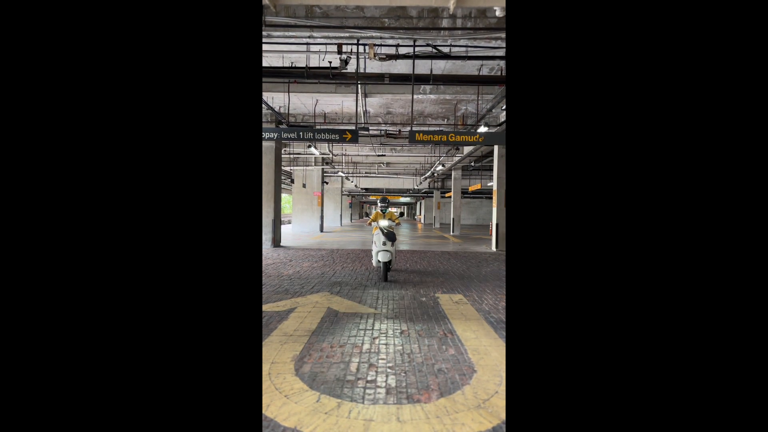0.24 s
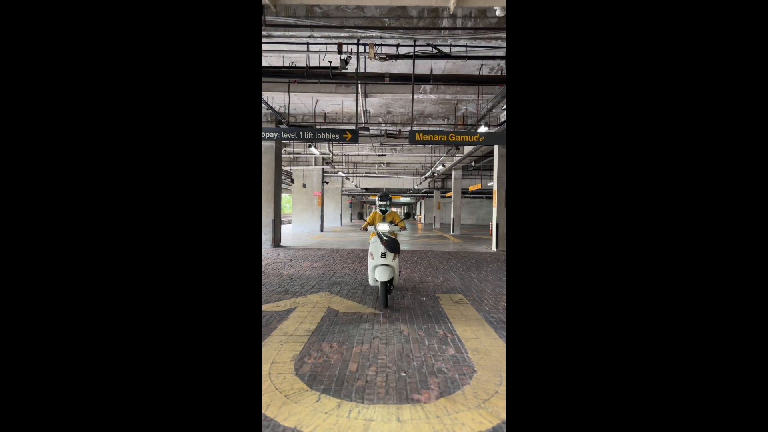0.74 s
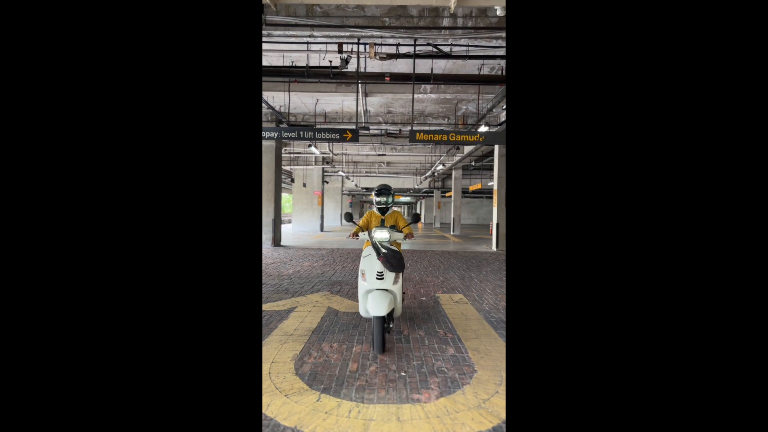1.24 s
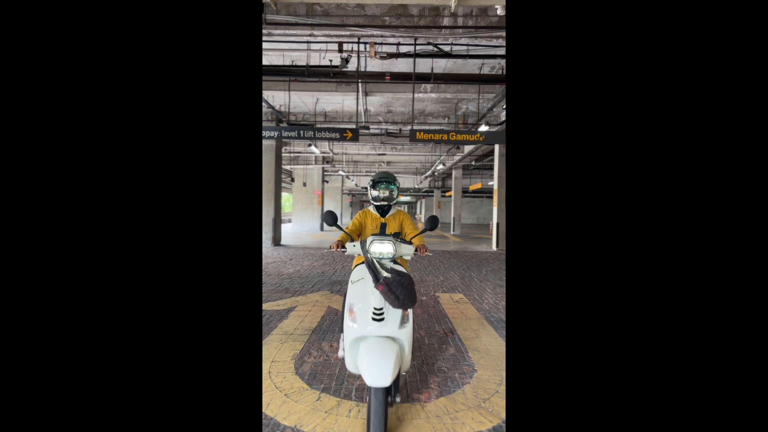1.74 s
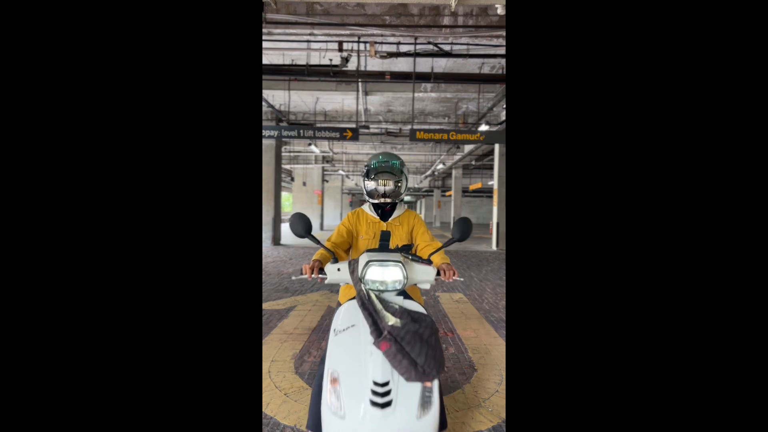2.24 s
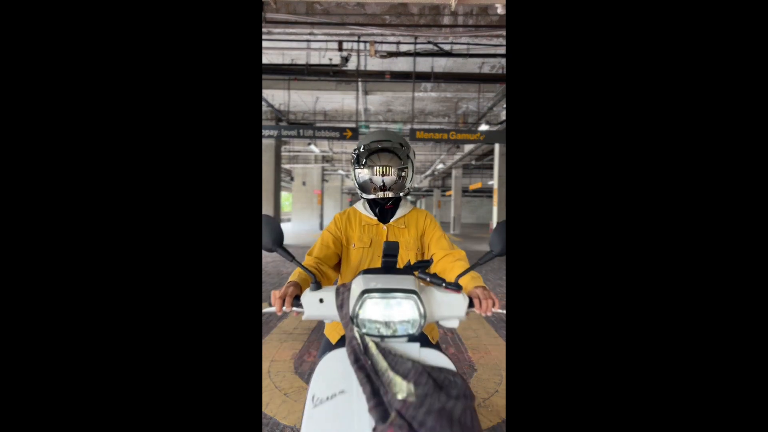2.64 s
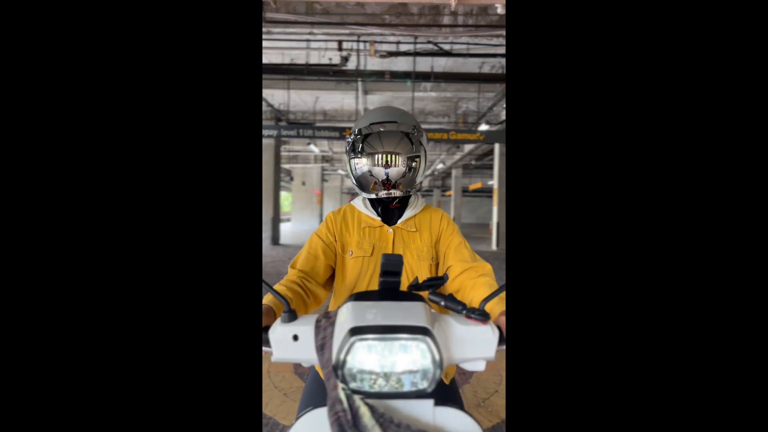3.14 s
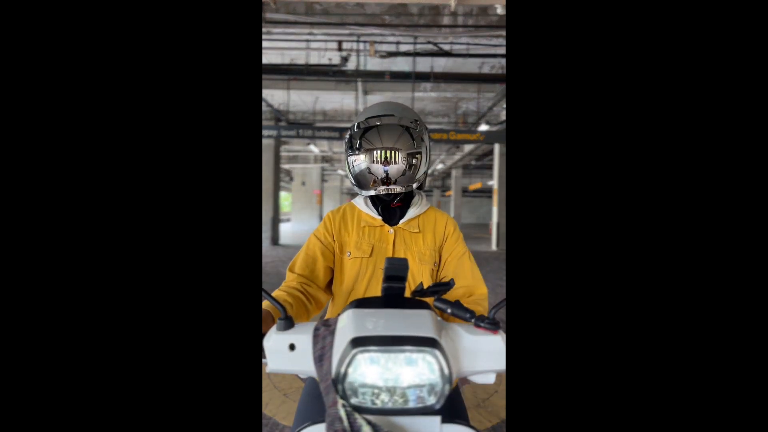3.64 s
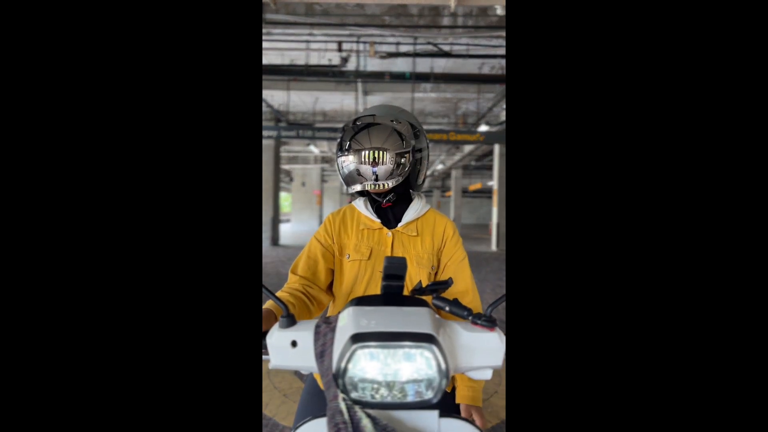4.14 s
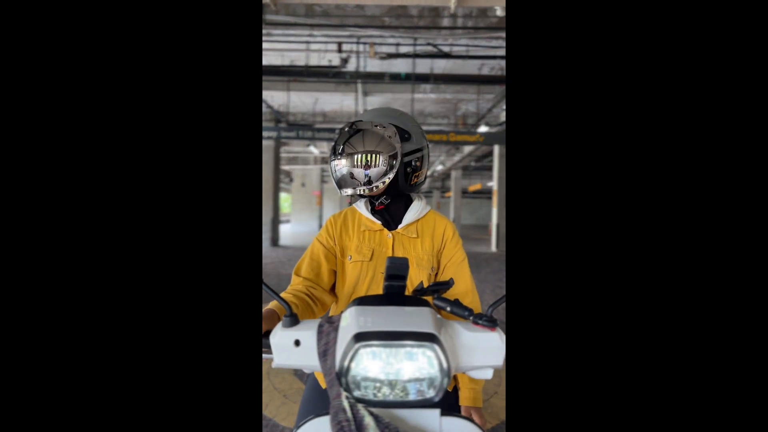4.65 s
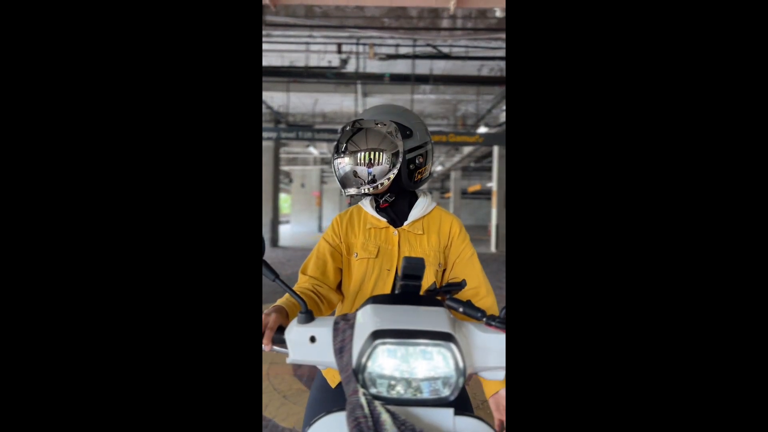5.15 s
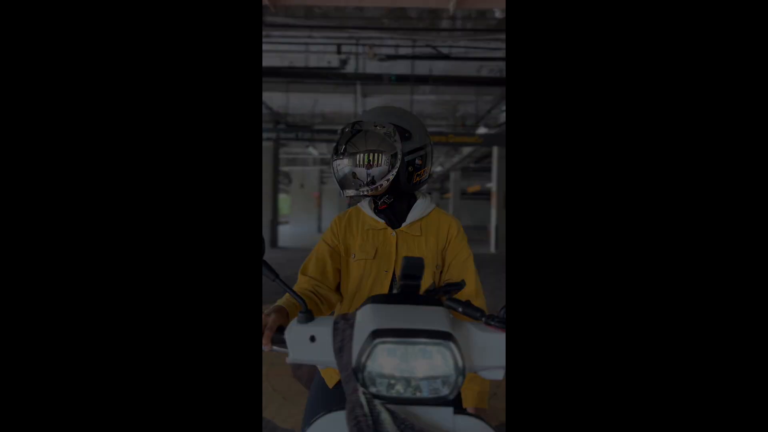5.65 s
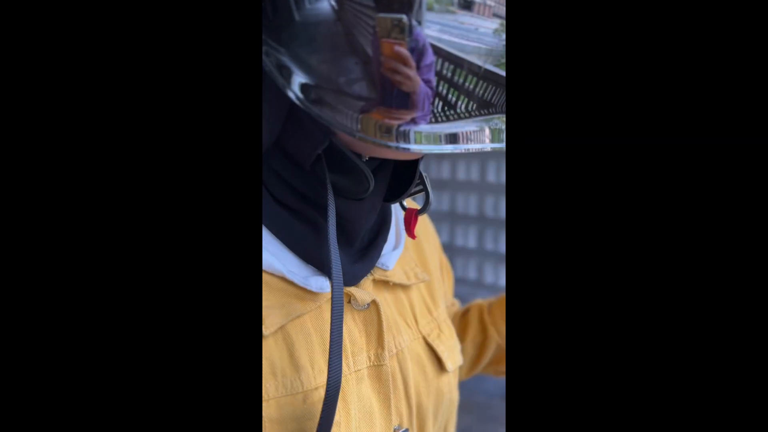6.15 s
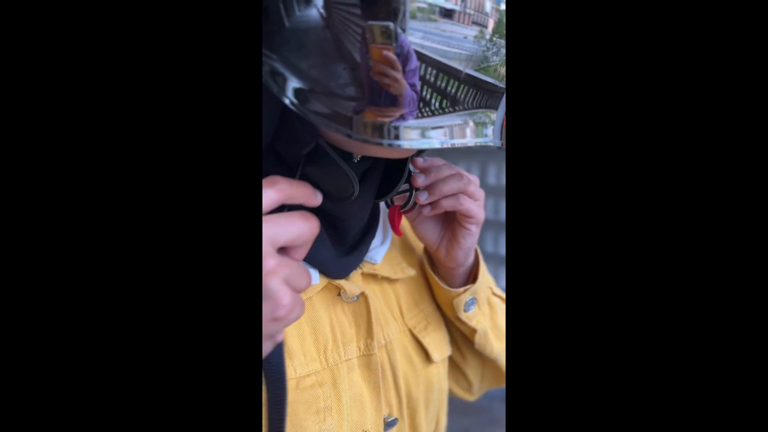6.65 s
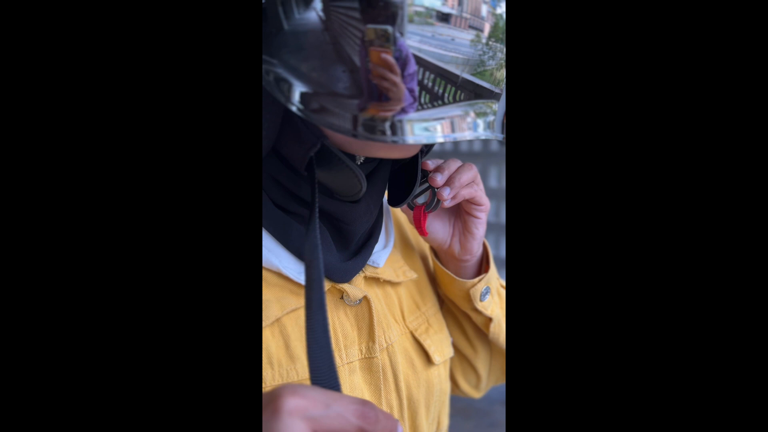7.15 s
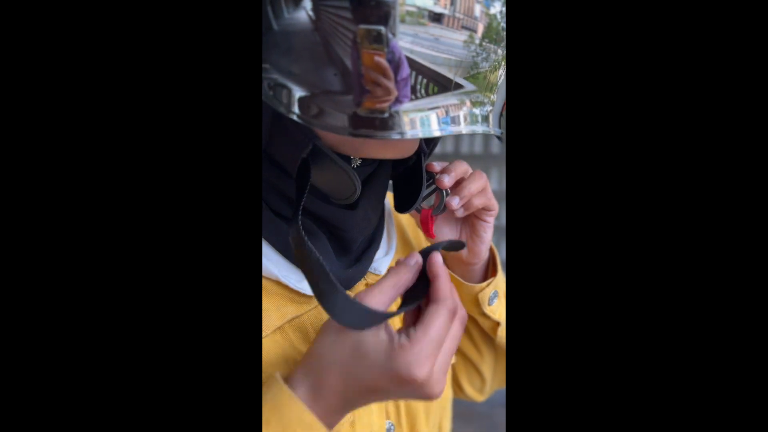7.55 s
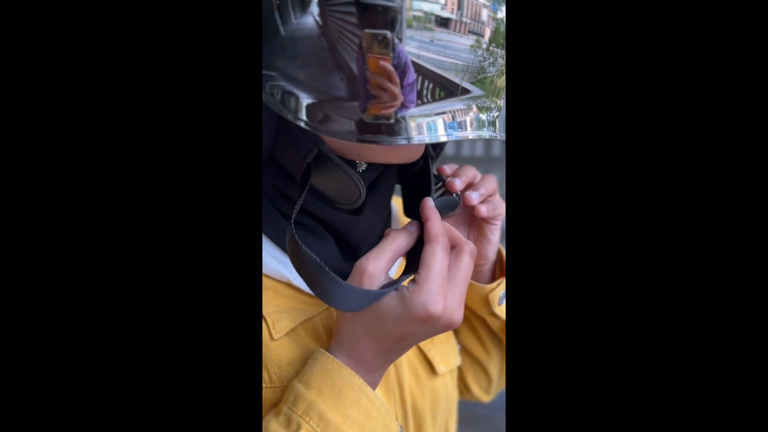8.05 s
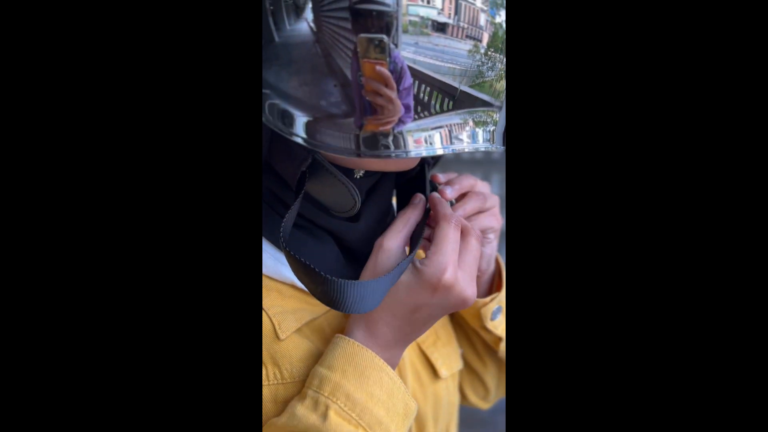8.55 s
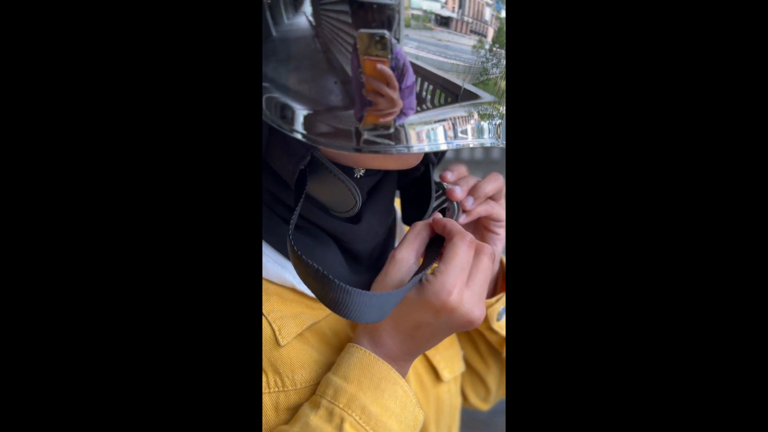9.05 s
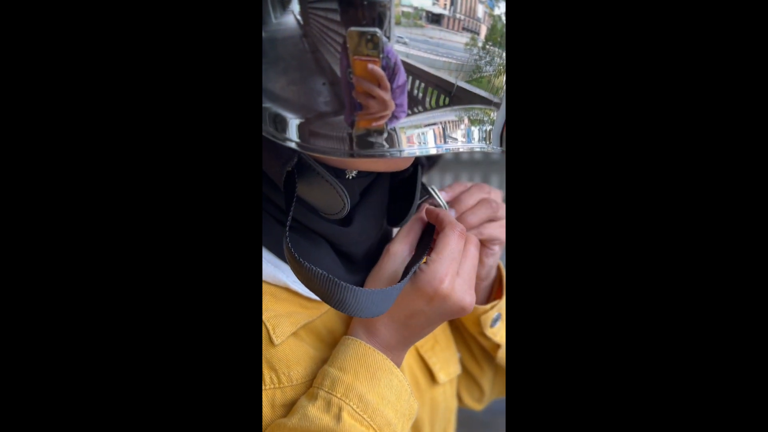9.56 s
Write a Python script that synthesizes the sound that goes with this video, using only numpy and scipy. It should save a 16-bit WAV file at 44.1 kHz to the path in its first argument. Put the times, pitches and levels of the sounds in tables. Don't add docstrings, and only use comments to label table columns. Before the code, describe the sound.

From 0 s, a single-cylinder scooter putters at a low, steady fifteen or so puffs per second through a concrete car park, booming from a distance over soft traffic rumble and airy roar. Between about 1.2 and 3 s it draws close; thin, high, stuttering brake squeaks chirp and echo, strongest around 2.5 to 2.9 s. From 3 to 5.8 s it idles nearby, thumping slightly unevenly, with tiny bright valve ticks clearest around 4 to 5 s. A split-second silence at 5.8 s cuts abruptly to a quieter street with low traffic wash and brief distant engine swells. Faint buckle ticks come around 6.5 to 6.7 s and 7.6 s, with very soft webbing slides. A firmer click lands at 9.0 s and a sharp double snap at 9.4 s. A car's low, throbbing hum and faint tyre sizzle grow from about 8.3 s, remaining near until the end at 9.8 s.

```python
import sys
import numpy as np
from scipy import signal
from scipy.fft import rfft, irfft, next_fast_len
from scipy.io import wavfile
from scipy.ndimage import uniform_filter1d, map_coordinates

SR = 44100
rng = np.random.default_rng(int(sys.argv[2]) if len(sys.argv) > 2 else 0)


def volts_from_db(level):
    exponent = np.asarray(level, float) / 20
    return 10 ** exponent


def waveform_to_disk(signal):
    frames = np.transpose(np.atleast_2d(signal))
    scaled = np.clip(frames, -1, 1) * 32767
    samples = np.round(scaled).astype(np.int16)
    wavfile.write(sys.argv[1], SR, samples)


N = 432621

# t/s, firing rate/Hz
ENGINE_SPEED = [(0, 14.55), (1.5, 14.0), (1.9, 14.74), (2.2, 15.27), (2.5, 15.378), (2.8, 15.48),
                (3.1, 14.972), (3.4, 15.065), (3.7, 15.31), (4.0, 15.177), (4.3, 15.15), (4.6, 14.977),
                (4.9, 14.665), (5.2, 15.225), (5.5, 15.624), (5.8, 15.488)]
# t/s, distance/m
APPROACH = [
    (0, 11),
    (1.5, 9.7),
    (2.1, 2.8),
    (2.7, 1.6),
    (3.3, 2.12),
    (4.1, 1.7),
    (5.1, 1.95),
    (5.8, 1.2),
]
# f/Hz, width/Hz, level/dB
PIPE_MODES = [(153, 11, 1), (178.2, 7, -2.5), (223, 37, -15)]
# f/Hz, width/Hz, level/dB
BODYWORK_MODES = [(61.6, 6, -7), (73.3, 6, -9.5), (95.2, 6, -11.5), (132.8, 8, -12)]
# f/Hz, width/Hz, level/dB
DECK_MODES = [(54.6, 8.3, -4.5), (140, 24, -9.5), (178.6, 16, 1.5), (179, 19, -5)]
# t/s, length/s, f/Hz, level/dB
PARK_DRONES = [(0.023, 0.6, 114.8, -29.5), (0.45, 0.39, 112, -29), (1.2, 0.29, 155, -32.5),
               (0.8, 0.62, 83.4, -27), (1.4, 0.36, 112, -27.5), (1.498, 0.61, 79.6, -27),
               (1.75, 0.48, 160, -28.5), (1.9, 0.85, 114.6, -34), (2.5, 0.46, 79.9, -27),
               (2.9, 0.31, 229.3, -32.5), (3.22, 0.3, 77.9, -25), (3.35, 0.35, 153, -34),
               (3.6, 0.45, 109.7, -31.5), (4.2, 0.29, 76.8, -35), (4.56, .3, 150, -30),
               (4.5, 0.45, 76.1, -30)]
# t/s, level over its mean/dB
PARK_FLOW = [
    (0, .5),
    (1.4, 0),
    (2.1, 0.6),
    (3.5, 0.33),
    (5.3, -0.35),
    (5.8, -0.5),
]
# f/Hz, density/dB per Hz
PARK_RUMBLE = [
    [(15, -59), (25, -30), (53, -3.5), (70, 0), (123, -4), (141, -6), (240, -8.5), (450, -16.5), (580, -44), (990, -120)],
    [(15, -64), (25, -34), (81, 2), (152, -12), (188, -7), (220, -4), (450, -8.5), (580, -38), (990, -120)],
]
PARK_ROAR = [
    [(180, -58), (300, -7), (349, -29), (436, -3), (670, -5.5), (960, 0), (1560, -11), (1920, -17.5), (3830, -26.5), (4780, -29), (6390, -33.5), (7550, -40.5), (8200, -80), (10700, -101), (18000, -120)],
    [(180, -32), (300, -23), (385, -34), (424, -6), (748, -4), (1210, -3.5), (1580, -9.5), (1840, -21.5), (2530, -22.5), (4980, -29.5), (8200, -36), (10700, -53), (18000, -120)],
]
PARK_HISS = [
    [(8200, -32), (8800, -10.5), (9500, 0.5), (11000, 4), (12800, 4), (14300, -0.5), (14900, -15), (15700, -33)],
    [(7500, -29), (8300, -2), (9200, -3), (10100, -0.5), (10900, -11), (11600, -36), (12600, -30), (13200, -11), (14200, 0), (15200, -13), (15800, -19)],
]
# t/s, length/s, level/dB, start f/Hz, glide/Hz
SQUEAKS = [(1.19, .045, -47, 6800, -30), (1.238, .02, -35, 6760, -20), (1.268, .024, -34, 6750, -20),
           (1.298, .02, -35, 6740, 0), (1.319, .018, -34, 6730, 0), (1.34, .03, -40, 6740, 0),
           (1.365, .03, -38, 6760, 120), (1.4, .06, -43, 6780, 0), (1.525, .022, -32, 6780, 220),
           (1.552, .062, -35, 6850, -30), (1.625, .022, -37, 6800, -250), (1.69, .06, -45, 7330, 0),
           (1.75, .025, -38, 7600, 20), (1.803, .022, -26, 7150, -330), (1.821, .008, -35, 6750, -450),
           (1.828, .016, -25, 6980, 240), (1.841, .027, -25, 7170, 50), (1.845, .05, -36, 6900, 0),
           (1.88, .022, -36, 7600, 30), (1.905, .03, -33, 7600, 40), (1.96, .02, -36, 7640, 40),
           (2.008, .014, -36, 7600, 0), (2.185, .025, -36, 7250, -300), (2.21, .05, -29, 7000, -170),
           (2.265, .04, -35, 6930, 60), (2.455, .02, -39, 7330, 20), (2.47, .022, -33, 7350, 30),
           (2.514, .022, -28, 7620, -60), (2.537, .04, -23, 7530, 70), (2.598, .055, -29, 7570, -30),
           (2.62, .04, -33, 7280, -100), (2.67, .035, -29, 7200, 20), (2.72, .035, -33, 7220, -20),
           (2.785, .02, -38, 7700, 400), (2.79, .022, -21, 7600, -40), (2.812, .036, -20, 7550, -10),
           (2.852, .026, -23, 7600, 60), (2.888, .044, -26, 7570, -40), (2.946, .016, -28, 7570, 0),
           (2.97, .016, -26, 7590, 0)]
# f/Hz, t60/s
PARK_REVERB = [(200, 1.2), (3000, 1), (7000, 0.89), (15000, 0.093)]
# t/s, peak level/dB
VALVE_TICKS = [(3.0467, -51), (3.1385, -48), (3.1719, -50), (3.2079, -48), (3.3396, -54), (3.4718, -46),
               (3.5067, -49), (3.5406, -48), (3.6055, -48), (3.6733, -51), (3.7372, -46), (3.801, -46),
               (3.8334, -46), (3.8664, -44), (3.8988, -52), (3.9322, -43), (3.9656, -49), (3.9991, -42),
               (4.0644, -42), (4.0973, -53), (4.1303, -44), (4.1951, -43), (4.229, -49), (4.2625, -42),
               (4.2954, -47), (4.3293, -40), (4.3947, -47), (4.4281, -48), (4.461, -44), (4.5274, -46),
               (4.5942, -46), (4.6601, -43), (4.6935, -50), (4.7279, -45), (4.7623, -54), (4.7957, -47),
               (4.8302, -50), (4.8636, -39), (4.9339, -41), (5.0028, -50), (5.4637, -50), (5.5291, -52),
               (5.5914, -48), (5.6568, -50), (5.7201, -48)]
# f/Hz, width/Hz, level/dB
VALVE_MODE = [(13600, 3600, 0)]
# t/s, level over its mean/dB
STREET_FLOW = [
    (5.79, 3),
    (5.86, -1),
    (6.8, -0.7),
    (7.8, -0.1),
    (8.8, 0.7),
    (9.81, 1.4),
]
# f/Hz, density/dB per Hz
STREET_RUMBLE = [
    [(15, -53), (25, -23), (47, -7.5), (65, 1.5), (97, -6), (138, -7.5), (170, -6.5), (210, -7), (243, -7.5), (329, -13.5), (450, -19.5), (580, -21.5), (990, -120)],
    [(15, -46), (25, -15), (75, 6.5), (134, -9), (243, 5.5), (284, -4), (450, 4.5), (580, -36), (990, -120)],
]
STREET_ROAR = [
    [(180, -42), (300, -24), (331, -14), (369, -5), (461, -8.5), (895, -1.5), (1430, -5.5), (1890, -15), (2230, -15.5), (2530, -20), (5190, -35), (7340, -45), (8200, -67), (10700, -94), (18000, -120)],
    [(180, -34), (300, -17), (390, -21), (424, -16), (544, 0), (1150, 1.5), (1600, -3.5), (1740, -15), (2330, -17), (6570, -35.5), (8200, -36.5), (10700, -66), (18000, -120)],
]
STREET_HISS = [
    [(8300, -39), (8800, -8), (9300, 0.5), (11000, -4.5), (13000, -6.5), (14200, -12), (15700, -39)],
    [(7500, -32), (8200, -7), (9500, -2), (10400, 1), (11200, -31), (12800, -30), (13600, -9), (15000, -11), (15800, -26)],
]
# t/s, length/s, f/Hz, level/dB
STREET_DRONES = [
    (6.3, 0.42, 68, -34.5),
    (6.6, .2, 120, -30.5),
    (6.98, .2, 70.3, -31),
    (7.4, .25, 109.8, -34),
    (8.15, 0.2, 76.5, -40),
    (8.65, 0.17, 62, -30),
    (7.75, .2, 80, -34),
    (8.1, 0.13, 164.6, -35),
]
# t/s, peak level/dB, ring f/Hz, ring over crack/dB
BUCKLE_CLICKS = [
    (6.5061, -55, 12050, -5),
    (6.6388, -68, 13100, 0),
    (6.6867, -53, 11800, -4),
    (6.6872, -57, 13200, -2),
    (6.7161, -64, 11900, 2),
    (7.5582, -56, 9700, -16),
    (9.0154, -46, 12800, -25),
    (9.4082, -35, 11800, -24),
    (9.4098, -37, 13500, -22),
]
# t/s, length/s, level/dB
SLIDES = [
    (6.6, 0.96, -78),
    (8.1, .3, -82),
    (8.65, .3, -80),
    (9.45, 0.78, -73),
]
# f/Hz, density/dB per Hz
FABRIC = [(8300, -40), (9000, -6), (11000, -2), (13000, -2), (14200, -12), (15700, -40)]
# t/s, engine order f/Hz, nearness/dB
CAR_APPROACH = [
    (7.9, 138, -30),
    (8.3, 140, -18),
    (8.75, 149, -15),
    (9.1, 156, 1.5),
    (9.81, 160, -3.5),
]
# f/Hz, density/dB per Hz
SIZZLE = [(1200, -30), (2500, 0.5), (4500, -4), (7500, -21.5), (8200, -62)]
# f/Hz, left minus right level/dB
PORTS = [(60, 0), (110, -3), (200, -2), (380, -2), (700, 0.5), (1290, -1.5), (2380, 2.0), (4400, 2.5),
         (8120, 1), (15000, -1)]

FIRING_PHASE = .067
EXHAUST_DB, BOOM_DB, BOOM_DB_PER_M = -23, -47.5, 1.43
DRONE_SAG_HZ_PER_S = 6.3
PARK_WASH_DB, STREET_WASH_DB = (-28.5, -31.5, -62), (-30.5, -34.5, -76.5)
WASH_GROWS, WASH_SIDE_DB = (0.54, 1.1, 1.1), (-11, -2.5, -1.5)
DISC_HZ, PAN_DB_PER_KHZ = 7200, -8
OCTAVE_DB, OCTAVE_DB_PER_KHZ = -30, -34
OCTAVE_GROWS = .7
PORT_LAG_S = .000052
SQUEAK_ROOM_DB, ROOM_DB_PER_KHZ = -11, -7
TICK_DB, TICK_CONTRAST = -21.5, 1.1
GAP_START_S, GAP_END_S = 5.7802, 5.7895
CRACK_T60_S, BUCKLE_T60_S = .005, .05
HUM_DB, SIZZLE_DB, SIZZLE_GROWS = -31.5, -54, 0.59
BEAT_HZ, BEAT_S = 2.88, 9.1
END_FADE_S = .004


def unit(x):
    return x / np.sqrt(np.mean(x ** 2) + 1e-20)


def along(points, hz):
    f, v = np.transpose(points)
    return np.interp(np.log(hz + 1), np.log(f + 1), v)


def curves(rows):
    s, *cols = np.transpose(rows)
    return [np.interp(np.arange(N) / SR, s, c) for c in cols]


def wobble(rate):
    coarse = np.arange(0, N + 32, 32)
    knots = rng.standard_normal(int(N * rate / SR) + 4)
    return np.interp(np.arange(N), coarse, map_coordinates(knots, [coarse * rate / SR]))


def filtered(x, response):
    m = next_fast_len(N + SR // 2)
    return irfft(rfft(x, m) * response(np.fft.rfftfreq(m, 1 / SR)), m)[..., :N]


def modes(table):
    return lambda f: sum(volts_from_db(db) * 1j * f * w / (c * c - f * f + 1j * f * w) for c, w, db in table)


def beats(turns, scatter_db, odd_db=0):
    whole = np.floor(turns).astype(int)
    at = np.flatnonzero(np.diff(whole)) + 1
    out = np.zeros(N)
    out[at] = volts_from_db(scatter_db * rng.standard_normal(len(at)) + odd_db * (whole[at] % 2))
    return out


def rush(colours, side_db, patchy_db):
    z = signal.stft(rng.standard_normal((2, N)), nperseg=512)[2]
    field = uniform_filter1d(rng.standard_normal(z.shape[1:]), 6, 0)
    field = uniform_filter1d(field, 14, 1)
    pair = signal.istft(z * volts_from_db(patchy_db * unit(field)), nperseg=512)[1][:, :N]
    mid, side = [unit(filtered(p, lambda hz: volts_from_db(along(c, hz)))) for p, c in zip(pair, colours)]
    return mid + volts_from_db(side_db) * np.outer([1, -1], side)


def engine(cycles):
    metres, = curves(APPROACH)
    exhaust_db = EXHAUST_DB - 20 * np.log10(metres)
    boom_db = BOOM_DB + BOOM_DB_PER_M * metres
    puff = np.blackman(round(.008 * SR))[40:]

    def soft(spikes):
        return signal.fftconvolve(spikes, puff)[:N]

    def band_limit(f):
        return (1j * f / (40 + 1j * f)) ** 3 / (1 + 1j * f / 900) ** 4

    near = soft(beats(cycles - FIRING_PHASE, scatter_db=1.1))
    pipe = unit(filtered(near, lambda f: modes(PIPE_MODES)(f) - modes(BODYWORK_MODES)(f)))
    far = soft(beats(2 * cycles, scatter_db=4, odd_db=-3))
    boom = unit(sum(volts_from_db(4 * wobble(3)) * filtered(far, modes([mode])) for mode in DECK_MODES))
    return volts_from_db(3) * filtered(volts_from_db(exhaust_db) * pipe + volts_from_db(boom_db) * boom, band_limit)


def drones(table):
    t, waver, out = np.arange(N) / SR, np.cumsum(2.6 * wobble(8)) / SR, 0
    for s, length, hz, db in table:
        u = np.clip(t - s, 0, length)
        sag = DRONE_SAG_HZ_PER_S * (u - length / 2) ** 2 / 2
        swell = abs(np.sin(np.pi * u / length)) ** 0.36
        out = out + volts_from_db(db) * swell * np.sin(2 * np.pi * (hz * t - sag + waver))
    return out * volts_from_db(0.74 * wobble(9.2))


def traffic(flow, mean_db, colours):
    swell, flow_db = .25 * wobble(2), curves(flow)[0]
    wash = np.zeros((2, N))
    for db, grows, colour, side_db in zip(mean_db, WASH_GROWS, colours, WASH_SIDE_DB):
        level_db = db + grows * flow_db + swell + 0.21 * wobble(9)
        wash += volts_from_db(level_db) * rush(colour, side_db, patchy_db=1.05)
    return wash


def reverb(x):
    hz, t, z = signal.stft(rng.standard_normal((2, SR)), SR, nperseg=256)
    decay = volts_from_db(-60 * t / along(PARK_REVERB, hz)[:, None])
    tail = signal.istft(z * decay, SR, nperseg=256)[1]
    return signal.fftconvolve(x[None], tail / np.linalg.norm(tail[0]), axes=1)[:, :N]


def brake():
    dry, drift = np.zeros((2, N)), 20 * wobble(120)
    fuzz = 1.5 * wobble(500)
    for s, length, db, start_hz, glide_hz in SQUEAKS:
        i, u = round(s * SR), np.linspace(0, 1, round(length * SR))
        span = slice(i, i + len(u))
        khz = (start_hz - DISC_HZ) / 1000
        turn = 2 * np.pi * np.cumsum(start_hz + glide_hz * u + drift[span]) / SR
        octave_db = OCTAVE_DB + OCTAVE_DB_PER_KHZ * khz + OCTAVE_GROWS * (db + 24)
        tone = np.sin(turn) + volts_from_db(octave_db) * np.sin(2 * turn + fuzz[span])
        tone = tone * abs(np.sin(np.pi * u)) ** 0.45 * volts_from_db(db)
        dry[:, span] += tone * volts_from_db(PAN_DB_PER_KHZ * khz * np.array([[.5], [-.5]]))
    flutter = volts_from_db(wobble(70) + 1.8 * np.array([wobble(160), wobble(160)]))
    direct = filtered(dry * flutter, lambda hz: np.exp(-2j * np.pi * np.outer([0, PORT_LAG_S], hz)))

    def room_send(hz):
        return volts_from_db(SQUEAK_ROOM_DB + ROOM_DB_PER_KHZ * np.clip((hz - DISC_HZ) / 1000, -1, 1))

    sent = filtered(dry.mean(axis=0), room_send)
    return direct + reverb(sent * volts_from_db(6 * wobble(260)))


def valves():
    s, db = np.transpose(VALVE_TICKS)
    spikes = np.zeros(N)
    spikes[np.round(s * SR).astype(int)] = volts_from_db(TICK_DB + TICK_CONTRAST * (db - db.mean()))
    ticks = filtered(spikes, lambda f: modes(VALVE_MODE)(f) ** 3)
    return np.array([ticks, 0.903 * np.roll(ticks, 1)])


def strap():
    out, t = np.zeros((2, N + SR)), np.arange(SR // 10) / SR
    for s, db, ring_hz, ring_db in BUCKLE_CLICKS:
        crack = volts_from_db(-60 * t / CRACK_T60_S) * rng.standard_normal((2, len(t)))
        fuzz = np.cumsum(rng.normal(0, .1, len(t)))
        ring = volts_from_db(-60 * t / BUCKLE_T60_S) * np.sin(2 * np.pi * ring_hz * t + fuzz)
        out[:, round(s * SR):][:, :len(t)] += volts_from_db(db + 2.0) * (crack + volts_from_db(ring_db) * ring)
    return filtered(out[:, :N], lambda f: modes([(12300, 5500, 1)])(f) ** 2)


def webbing():
    t, strokes = np.arange(N) / SR, np.zeros(N)
    for s, length, db in SLIDES:
        strokes += volts_from_db(db) * abs(np.sin(np.pi * np.clip((t - s) / length, 0, 1)))
    return strokes * volts_from_db(2.7 * wobble(14)) * rush((FABRIC, STREET_HISS[1]), side_db=-1, patchy_db=6)


def car():
    order_hz, near_db = curves(CAR_APPROACH)
    turn = 2 * np.pi * np.cumsum(order_hz + 2.45 * wobble(7.9)) / SR
    throb = 0.62 + 0.51 * np.cos(2 * np.pi * BEAT_HZ * (np.arange(N) / SR - BEAT_S))
    hum = throb * (np.sin(turn) + volts_from_db(-7.5 + 2.5 * wobble(12)) * np.sin(1.57 * turn))
    tyres = rush((SIZZLE, SIZZLE), side_db=-6, patchy_db=1.0)
    return volts_from_db(HUM_DB + near_db) * hum + volts_from_db(SIZZLE_DB + SIZZLE_GROWS * near_db) * tyres


def scene():
    t, cycles = np.arange(N) / SR, np.cumsum(curves(ENGINE_SPEED)[0]) / SR
    scooter = engine(cycles) + drones(PARK_DRONES) + brake() + valves()
    park = scooter + traffic(PARK_FLOW, PARK_WASH_DB, (PARK_RUMBLE, PARK_ROAR, PARK_HISS))
    street = traffic(STREET_FLOW, STREET_WASH_DB, (STREET_RUMBLE, STREET_ROAR, STREET_HISS))
    street = street + drones(STREET_DRONES) + strap() + webbing() + car()
    park_out = np.clip((GAP_START_S - t) / 0.0001, 0, 1)
    street_in = np.clip((t - GAP_END_S) / 0.0017, volts_from_db(-25.0), 1) * (t > GAP_START_S)
    end_fade = np.clip((t[-1] - t) / END_FADE_S, 0, 1)
    return park * park_out + street * street_in * end_fade


def low_pass(x):
    return signal.sosfilt(signal.butter(12, 15740, fs=SR, output="sos"), x)


def record(dry):
    mix = filtered(dry, lambda hz: volts_from_db(np.outer([.5, -.5], along(PORTS, hz))))
    return low_pass(mix)


dry = scene()
out = record(dry)
waveform_to_disk(out)
```